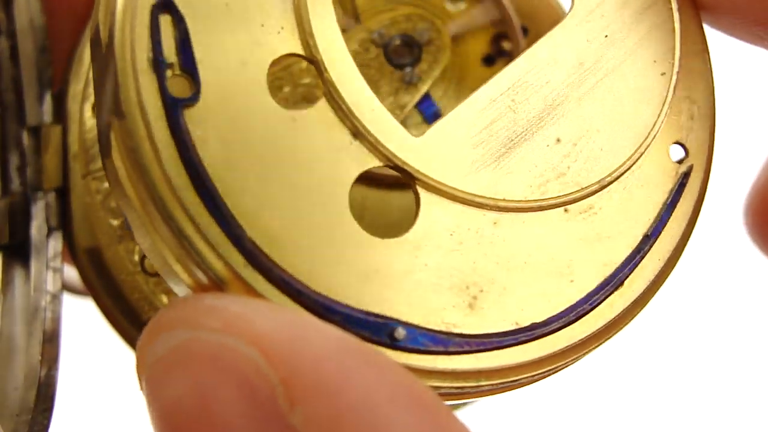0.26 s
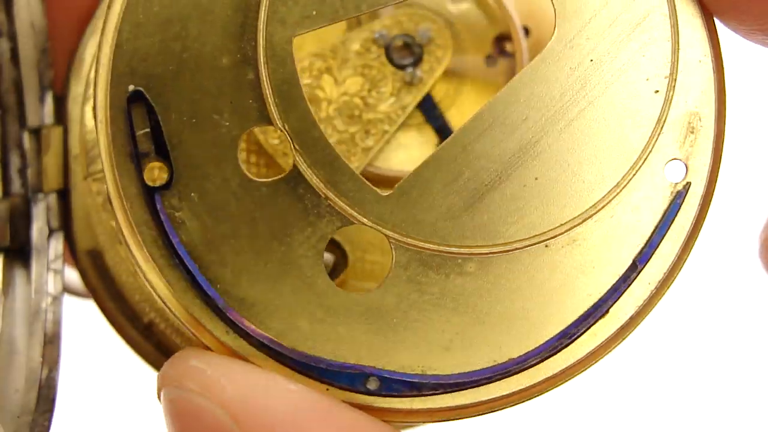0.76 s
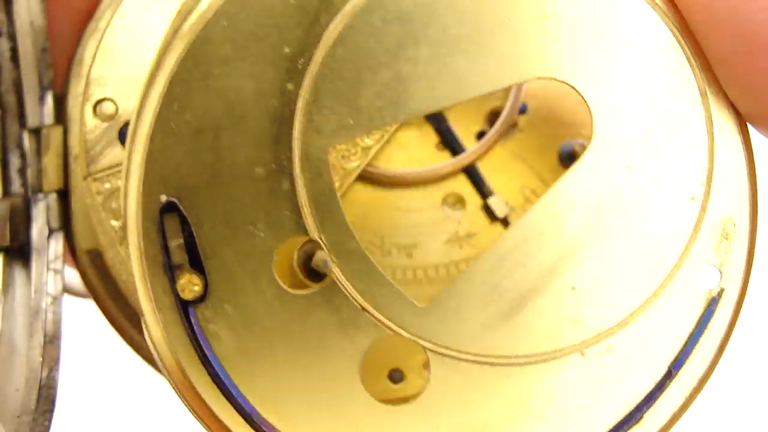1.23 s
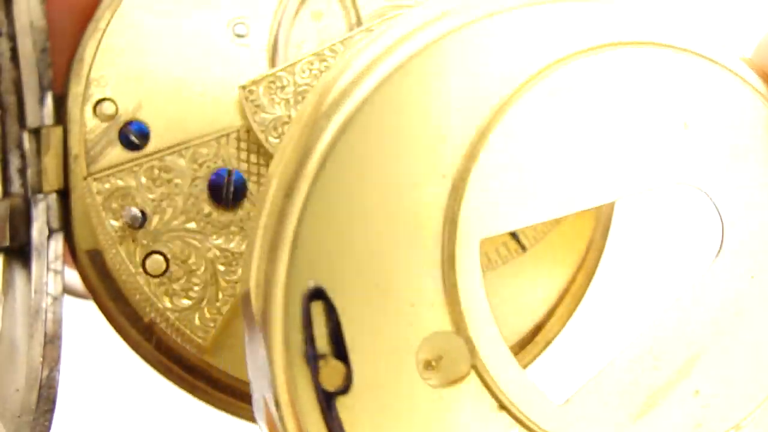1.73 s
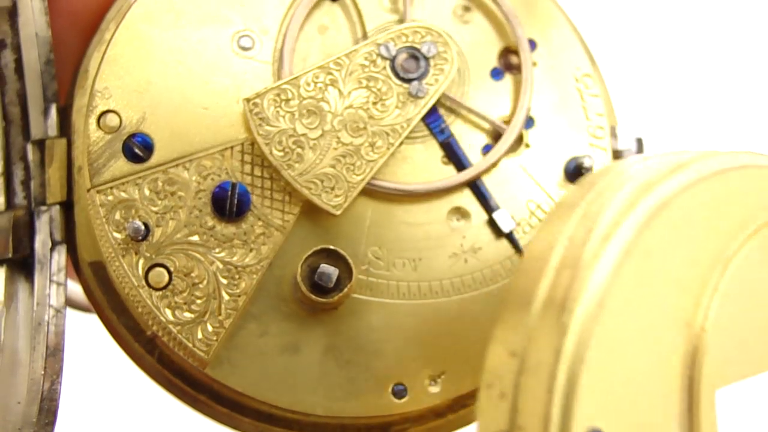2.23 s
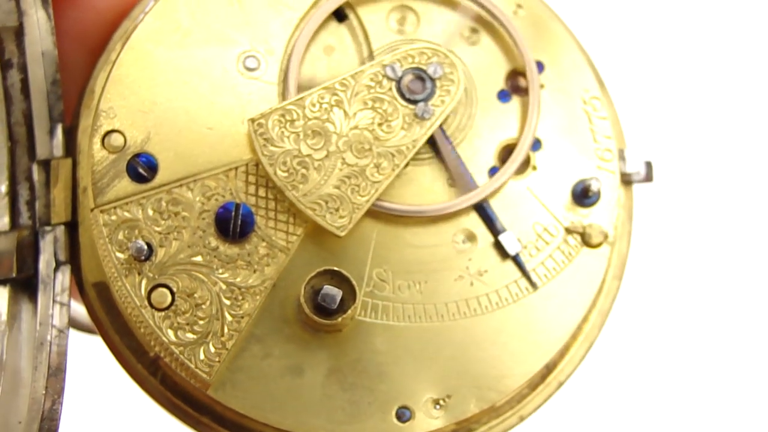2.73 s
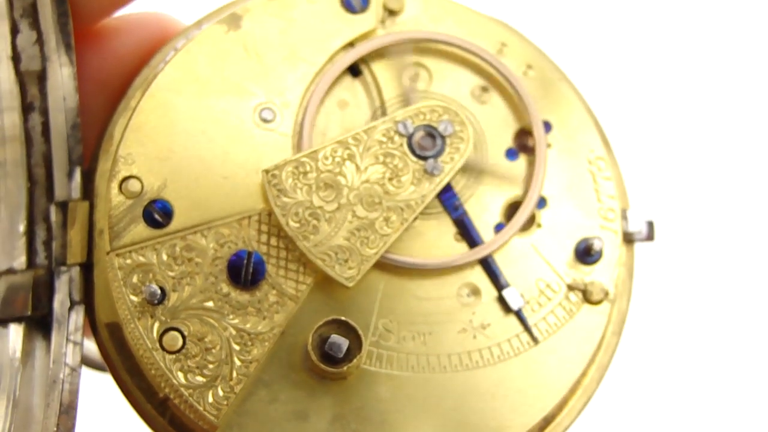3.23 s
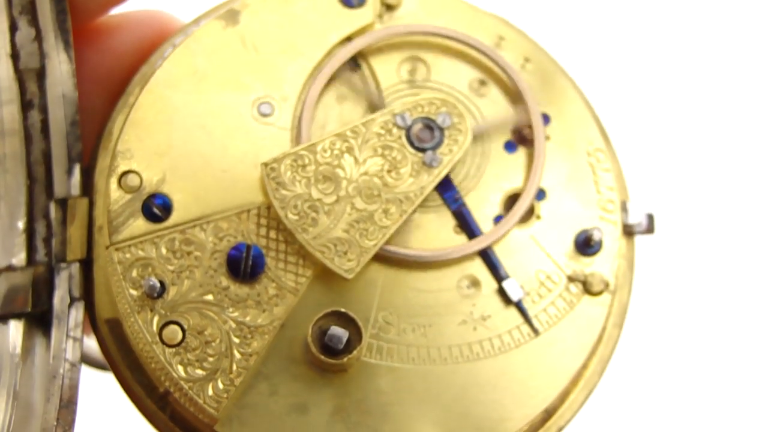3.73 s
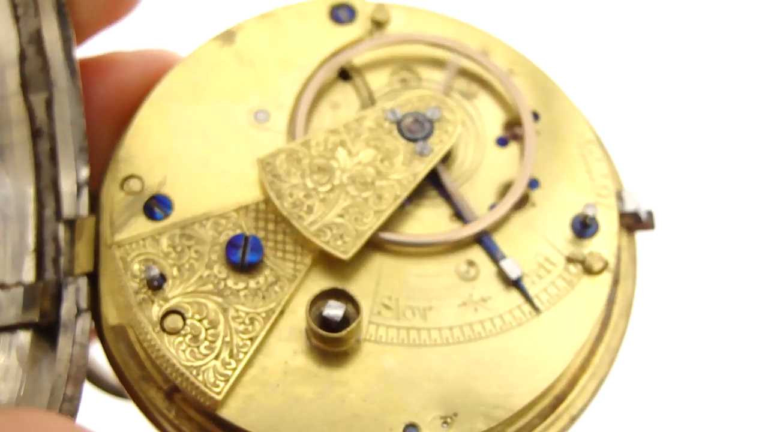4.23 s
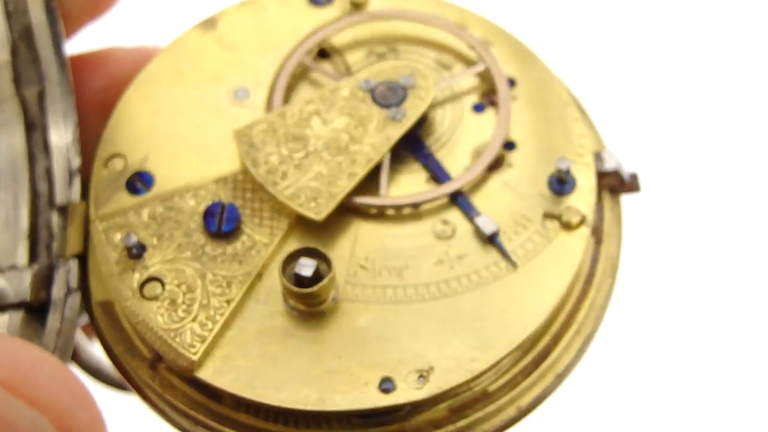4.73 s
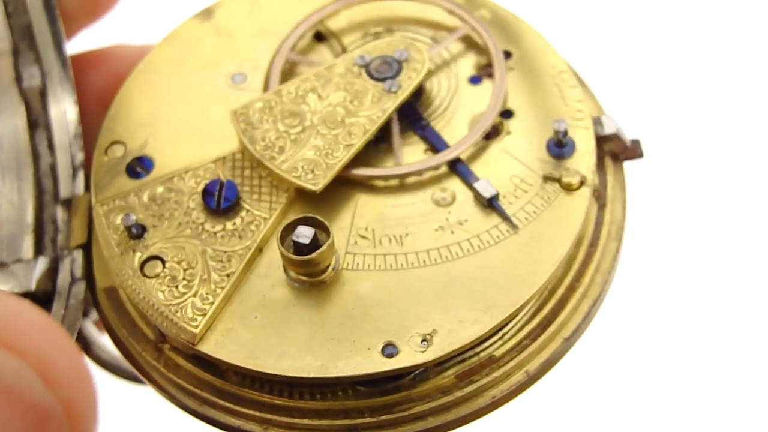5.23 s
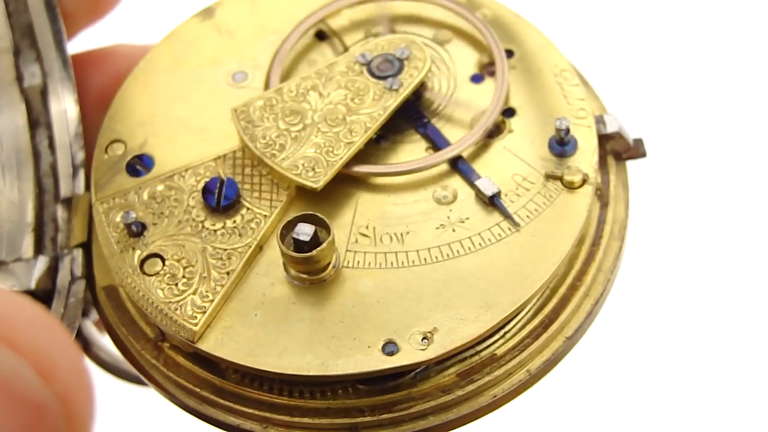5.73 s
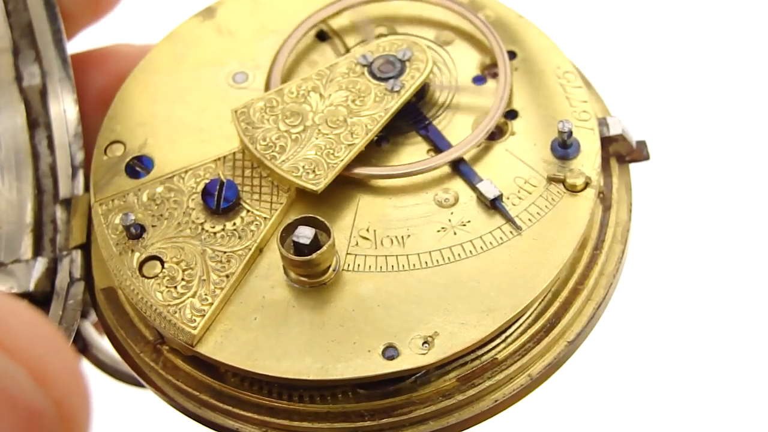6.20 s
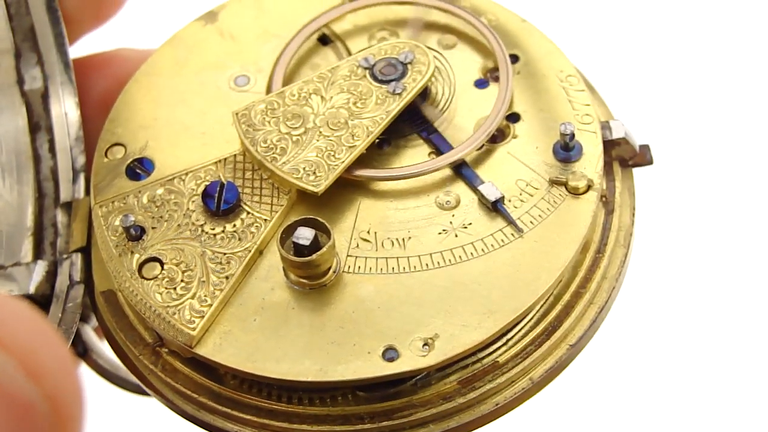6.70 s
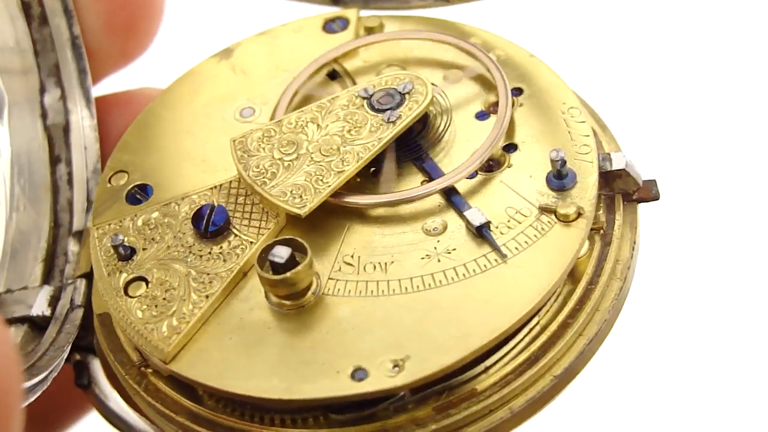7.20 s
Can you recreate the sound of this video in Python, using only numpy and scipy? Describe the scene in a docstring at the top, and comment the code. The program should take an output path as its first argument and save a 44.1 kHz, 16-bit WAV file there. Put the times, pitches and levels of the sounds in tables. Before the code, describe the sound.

An open antique pocket watch ticks fast and evenly, a little over four beats a second, tick and tock slightly different. A faint tap comes as its dust cap is lifted away, and later a fuller, louder metal click of the case. Close microphone in a small quiet indoor room, with steady fan noise and a dull wall clock stepping each second.

```python
"""An open antique pocket watch ticks close by, about 4.4 beats a second, while its dust cap is lifted off.
Each beat is a lead-in of faint escapement contacts, then a sharp drop that chatters: decaying modes of steel and
brass with short noise bursts. The case clicks in the hand, as damped modes plus a snap of noise.
Behind are the soft one-second step of a room clock, as swelling noise, and a fan, as coloured noise with hum lines."""
import sys
import numpy as np
from scipy import signal
from scipy.fft import rfft, irfft, next_fast_len
from scipy.io import wavfile
from scipy.ndimage import map_coordinates

SR = 44100
rng = np.random.default_rng(int(sys.argv[2]) if len(sys.argv) > 2 else 0)


def store_wav(level_fs):
    """Save 16-bit WAV to argv[1]."""
    pcm = np.round(np.clip(np.atleast_2d(level_fs), -1, 1) * 32767)
    wavfile.write(sys.argv[1], SR, pcm.T.astype(np.int16))


N = 328986

# All levels in dB are relative, unless called rms. A t60 is the time in which a mode decays by 60 dB.
# The unlocking and impulse contacts that lead into a tick and a tock, then the drop with its rebounds.
# Each row: time from the drop in seconds, level in dB, timing scatter in seconds.
TICK_LEAD_IN = [(-.0318, 0, 0.00031), (-.0195, -6, .001), (-.0168, -5.5, .0007)]
TOCK_LEAD_IN = [(-.0315, -3, 0.001), (-.0298, 0, .0006), (-.0222, 3, .0005)]
TICK_REBOUNDS = [(0, -8, 0.00011), (.001, -5, 0.00034), (.0039, -5.5, 0.00038), (.0057, -11.5, .0006)]
TOCK_REBOUNDS = [(0, -4.5, 0.000089), (.001, -5.5, .0003), (.0028, -1.5, .0004), (.0055, -12, .0009)]
# Modes of the steel escapement, the brass plates and the escape wheel's teeth, then the lightly damped
# modes that sing on after the drop. Each row: frequency in Hz, level in dB, t60 in seconds.
STEEL_MODES = [(5796, -2.5, 0.014), (6226, -1, 0.0091), (6530, -1, 0.012), (6680, -3, 0.014),
               (6780, -6.5, 0.022)]
BRASS_MODES = [(2582, 2.5, 0.031), (3650, -6.5, 0.024), (4170, 4, 0.012), (5060, -5, 0.018)]
TOOTH_MODES = [(8700, -0.19, 0.01), (10570, -1.1, 0.0068)]
STEEL_RING_MODES = [(6280, -4, .05), (6630, 0, .06), (9950, -19, .06)]
BRASS_RING_MODES = [(4312, 0, .065)]
# Noise spectrum of the bare escapement contact. Each row: frequency in Hz, level in dB.
CONTACT_SPECTRUM = [(1500, -34), (2500, 7), (5000, 3.5), (7500, 5), (11000, 9.5)]
# Levels of the parts that hardly follow the steel, one row for a tick and one for a tock. Each row: brass in dB,
# tooth edge in dB, steel after-ring in dB, brass after-ring in dB, lead-in in dB, lead-in edge in dB.
BEAT_VOICING = [(-67, -54.5, -64, -67, -67, -59), (-61.5, -56.5, -65.5, -70.5, -63, -65.5)]
# The rate wanders slightly as the watch is tilted. Each row: time in seconds, lateness of the beat in seconds.
BEAT_LATENESS = [(0, -.0006), (3.6, .0007), (7.4, -.0006)]
# The steel ring changes as the watch turns in the hand. Each row: time in seconds, level in a tick in dB,
# level in a tock in dB, favoured frequency in Hz.
STEEL_TURNING = [(.1, -50.5, -45, 6230), (.8, -48, -48, 6640), (1.3, -48.5, -49.5, 6340),
                 (1.75, -49, -45, 6400), (2.3, -45, -49, 6480), (3.5, -47, -45.5, 6750),
                 (3.8, -47, -44, 5820), (4.3, -44, -48, 6120), (5.15, -51, -48, 6150),
                 (6.4, -50.5, -48, 6150), (6.8, -49.5, -52, 6350), (7.3, -53, -49.5, 5790)]
# With the dust cap off, the faint parts carry better. Each row: time in seconds, gain of the lead-in's edge
# in dB, gain of the brass after-ring in dB.
CAP_UNCOVERING = [(0, -2.5, -5), (1.7, -4, 1), (2.4, 0, -5), (3.6, -2, 3.5), (4.6, 2.5, 4.5), (5.2, 3, 3),
                  (7.3, 1.5, 0)]
# Handling clicks. Each row: start in seconds, level in dB, fullness in dB (0: the whole case rings, less: a thin tap).
CASE_CLICKS = [(2.266, -35.5, -10), (4.4035, -24, 1.5)]
# Modes of the watch case. Each row: frequency in Hz, level in dB, t60 in seconds.
CASE_MODES = [(278, -15, 0.082), (540, -8, .03), (684, -17, 0.033), (763, -10, 0.065), (930, -16, 0.018),
              (1060, -4, 0.044), (1330, -5, 0.027), (1620, -1.5, 0.033), (1780, -12, 0.046),
              (2220, -1.5, 0.024), (3140, 3, 0.015), (4290, 1.5, 0.014), (5880, -1, .018), (6220, -12, .02),
              (7900, -6, 0.015)]
# Noise spectrum of the case's contact. Each row: frequency in Hz, level in dB.
SNAP_SPECTRUM = [(150, -30), (600, -16), (1000, 2), (3500, 5), (5200, -3), (8000, -9), (11000, -13)]
# Steps of the room clock. Each row: start in seconds, level in dB.
CLOCK_STEPS = [(.95, -42), (1.972, -47), (2.962, -45.5), (3.965, -48), (4.962, -47), (5.965, -47),
               (6.96, -46)]
# Noise spectrum of a clock step. Each row: frequency in Hz, level in dB.
CLOCK_SPECTRUM = [(300, -36), (620, -16), (790, -6.5), (990, -4.5), (1250, -14), (2400, -20), (5000, -43)]
# Noise spectrum of the fan's air. Each row: frequency in Hz, spectral density in dB.
AIR_SPECTRUM = [(15, -47), (25, -26.5), (92, -11.5), (229, -3), (303, -2.5), (466, -3.5), (649, -3),
                (737, -4.5), (859, -4), (1200, -5.5), (1660, -7), (2260, -10), (4610, -13.5), (6410, -16),
                (10900, -18), (14200, -37), (22000, -120)]
# Fan housing resonances. Each row: centre in Hz, full width at half height in Hz, gain added to unity in dB.
HOUSING_RESONANCES = [(609, 38, -9.5), (1067, 50, -17), (1650, 48, -1.5), (1880, 52, -2.5)]
# Fan hum lines. Each row: frequency in Hz, rms level in dB.
HUM_LINES = [(240, -72), (480, -72), (600, -76.5), (897, -74.5), (1080, -72), (1701, -74)]

# The balance keeps time: first tick, one full swing, and the tock a little past halfway after the tick.
FIRST_TICK_S, SWING_S, TOCK_AFTER_S = 0.1229, 0.4585, 0.2385
AFTER_RING_SCATTER_DB = 2  # how much the after-ring differs from beat to beat
FAVOUR_GAIN, FAVOUR_WIDTH_HZ = 1.36, 270  # gain added to unity at the favoured pitch; half-width at 1/e
BUILD_S = .0065  # time constant in which the rebounds pump up the long modes
TOP_HZ = 11040  # centre of the upper band limit


def watch():
    """Isochronous oscillation: the balance swings to and fro, so ticks and tocks alternate in a slight limp."""
    out = np.zeros(N)
    t = np.arange(-SR // 20, SR // 12) / SR  # the drop is at t = 0
    tick_voicing, tock_voicing = BEAT_VOICING
    for tick_s in np.arange(FIRST_TICK_S, N / SR - TOCK_AFTER_S / 2, SWING_S):
        tock_s = tick_s + TOCK_AFTER_S
        tick_db, _, tick_hz = curve(STEEL_TURNING, tick_s)
        _, tock_db, tock_hz = curve(STEEL_TURNING, tock_s)
        tick = beat(t, tick_s, TICK_LEAD_IN, TICK_REBOUNDS, tick_voicing, tick_db, tick_hz)
        tock = beat(t, tock_s, TOCK_LEAD_IN, TOCK_REBOUNDS, tock_voicing, tock_db, tock_hz)
        for s, sound in [(tick_s, tick), (tock_s, tock)]:
            late_s, = curve(BEAT_LATENESS, s)
            add(out, s + late_s + t[0], sound)
    return out


def beat(t, s, lead_in, rebounds, voicing, steel_db, favoured_hz):
    """Impact excitation: the escapement unlocks faintly, a tooth drops and chatters, steel and brass sing on."""
    brass_db, edge_db, steel_ring_db, brass_ring_db, lead_db, lead_edge_db = voicing
    lead_lift_db, ring_lift_db = curve(CAP_UNCOVERING, s)

    lead, _, lead_edge = chatter(lead_in, t)
    unlock = amp(lead_db) * unit(lead) + amp(lead_edge_db + lead_lift_db) * unit(lead_edge)

    def favour(hz):
        return 1 + FAVOUR_GAIN * np.exp(-((hz - favoured_hz) / FAVOUR_WIDTH_HZ) ** 2)

    steel, brass, edge = chatter(rebounds, t)
    steel = filtered(steel, favour)
    drop = amp(steel_db) * unit(steel) + amp(brass_db) * unit(brass) + amp(edge_db) * unit(edge)

    build = 1 - np.exp(-np.abs(t) / BUILD_S)
    after_ring = np.zeros(len(t))
    for modes, db in [(STEEL_RING_MODES, steel_ring_db), (BRASS_RING_MODES, brass_ring_db + ring_lift_db)]:
        level = amp(db + AFTER_RING_SCATTER_DB * rng.standard_normal())
        after_ring += level * unit(build * ring(modes, t, scatter_db=2))
    return unlock + drop + after_ring


def chatter(contacts, t):
    """Repeated impact: each contact sounds the steel, the brass and the crisp edge of the tooth."""
    steel, brass, edge = np.zeros((3, len(t)))
    u = t[:SR // 40] - t[0]  # seconds since the contact
    rise = 1 - np.exp(-u / 0.00012)
    for delay, db, scatter in contacts:
        s = delay + scatter * rng.standard_normal() - t[0]
        force = amp(db + 1.6 * rng.standard_normal()) * rise
        hardness = amp(0.4 * db)  # softer contacts have a weaker edge, so they are duller
        add(steel, s, force * unit(ring(STEEL_MODES, u, scatter_db=2.0)))
        add(brass, s, force * ring(BRASS_MODES, u, scatter_db=3.0))
        tooth = amp(-2) * ring(TOOTH_MODES, u, scatter_db=3.5)
        crack = fade(u, 0.03) * noise(CONTACT_SPECTRUM, len(u))
        add(edge, s, force * hardness * (tooth + crack))
    return steel, brass, edge


def ring(modes, t, scatter_db):
    """Modal superposition: a contact starts every damped mode at a new strength and phase."""
    hz, db, t60 = np.transpose(modes)[:, :, None]
    strength = amp(db + scatter_db * rng.standard_normal(hz.shape))
    phase = rng.random(hz.shape)  # in cycles
    return np.sum(strength * fade(t, t60) * np.sin(2 * np.pi * (hz * t + phase)), axis=0)


def handling():
    """Modal ringing under impact: the case snaps in two quick contacts, and its low modes ring a little longer."""
    out, t = np.zeros(N), np.arange(SR // 8) / SR
    for s, db, body_db in CASE_CLICKS:
        # (Hz, dB): fullness governs the low end
        colour = [(100, body_db - 21), (250, body_db + 1.5), (600, body_db - 4), (1000, body_db + 0.5),
                  (1700, body_db + 2), (2500, 0), (4800, 0), (6000, body_db / 2)]
        for delay, contact_db in [(0, -1), (.0021, -0.28)]:
            body = (1 - np.exp(-t / 0.00016)) * ring(CASE_MODES, t, scatter_db=2.5)
            snap = fade(t, 0.026) * noise(SNAP_SPECTRUM, len(t))
            contact = amp(-12.5) * body + amp(-11.5) * snap
            click = filtered(contact, lambda hz: amp(along(colour, hz)))
            add(out, s + delay, amp(db + contact_db) * click)
    return out


def room(x, t60, wet_db):
    """Reverberation by convolution: a short, weak, decaying noise tail from the table and walls."""
    t = np.arange(SR // 3) / SR
    tail = rng.standard_normal(len(t)) * fade(t - .004, t60)
    return x + amp(wet_db) * signal.fftconvolve(x, tail / np.linalg.norm(tail))[:N]


def room_clock():
    """Two-rate decay: a dull, distant step each second, followed by the room's slower, weaker answer."""
    out, t = np.zeros(N), np.arange(SR // 3) / SR
    onset = 1 - np.exp(-t / 0.0047)
    swell = onset * (fade(t, 0.13) + amp(-9) * fade(t, 0.25))
    for s, db in CLOCK_STEPS:
        add(out, s, amp(db - 3) * swell * noise(CLOCK_SPECTRUM, len(t)))
    return out


def fan():
    """Resonant filtering: steady air noise is coloured by the housing, beside slightly unsteady motor lines."""
    def housing(hz):
        return 1 + sum(amp(db) / (1 + (2 * (hz - centre) / width) ** 2) for centre, width, db in HOUSING_RESONANCES)

    air = amp(-52.5) * unit(filtered(noise(AIR_SPECTRUM, N), housing))
    t = np.arange(N) / SR
    hum = np.zeros(N)
    for hz, db in HUM_LINES:
        level = amp(0.65 * wobble(3.32))
        line = np.sin(2 * np.pi * hz * t + 0.74 * wobble(5))
        hum += amp(db) * unit(level * line)
    return air + hum


def amp(db):
    """Logarithmic level: decibels to amplitude gain."""
    return 10 ** (np.asarray(db) / 20)


def unit(x):
    """Normalisation: scale to rms 1."""
    return x / np.sqrt(np.mean(x ** 2) + 1e-20)


def fade(t, t60):
    """Exponential decay: silent before t = 0, then 60 dB down after t60."""
    return (t >= 0) * np.exp(-np.log(1000) * np.abs(t) / t60)


def curve(rows, s):
    """Linear interpolation: the value of each column of a control curve at time s."""
    times, *columns = np.transpose(rows)
    return [np.interp(s, times, column) for column in columns]


def along(points, hz):
    """Interpolation of (Hz, value) points on a log frequency axis."""
    f, v = np.transpose(points)
    return np.interp(np.log(hz + 1), np.log(f), v)


def filtered(x, response):
    """Linear filtering: the spectrum of x times a response of frequency."""
    size = next_fast_len(len(x) + 4096)
    return irfft(rfft(x, size) * response(np.fft.rfftfreq(size, 1 / SR)), size)[:len(x)]


def noise(spectrum, size):
    """Spectral shaping: white noise coloured by a spectrum, at rms 1."""
    return unit(filtered(rng.standard_normal(size), lambda hz: amp(along(spectrum, hz))))


def wobble(rate):
    """Slow random modulation: a smooth curve through random knots, rate of them a second."""
    knots = rng.standard_normal(int(N * rate / SR) + 4)
    return map_coordinates(knots, [np.arange(N) * rate / SR])


def add(track, s, sound):
    """Superposition: mix a sound into the track at time s."""
    part = track[max(0, round(s * SR)):][:len(sound)]
    part += sound[:len(part)]


def scene():
    """Superposition of sources: watch and case close by with a room tail, clock and fan behind."""
    close = room(watch() + handling(), t60=0.066, wet_db=-18.5)
    return (close + room_clock() + fan())[None]


def record(dry):
    """Band limitation: a low-pass falls to nothing over 200 Hz around TOP_HZ."""
    def low_pass(hz):
        return np.clip((TOP_HZ - hz) / 200 + .5, 0, 1)

    return np.array([filtered(x, low_pass) for x in dry])


dry = scene()
out = record(dry)
store_wav(out)
```